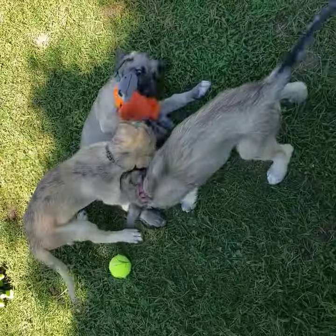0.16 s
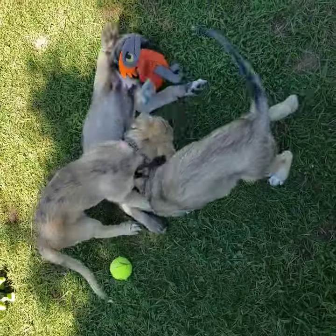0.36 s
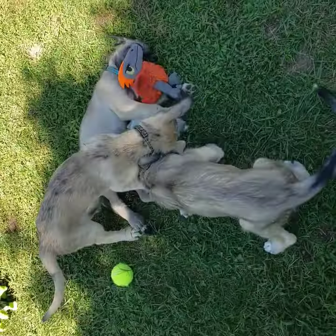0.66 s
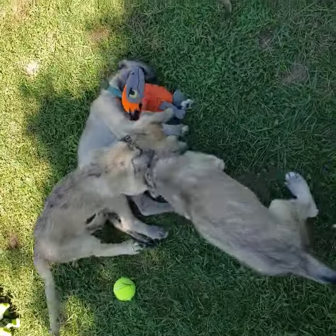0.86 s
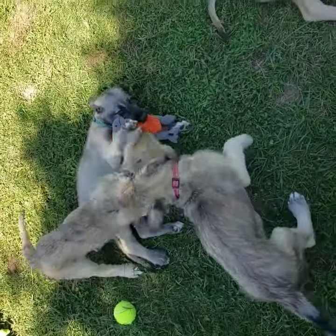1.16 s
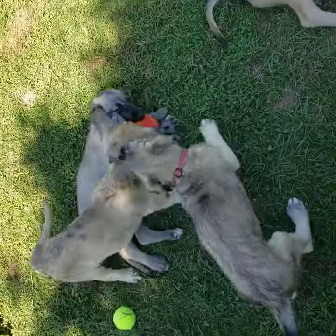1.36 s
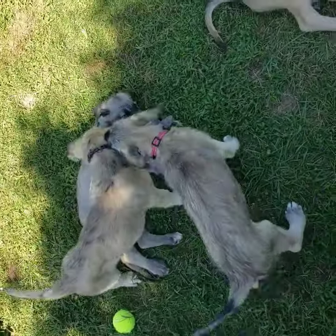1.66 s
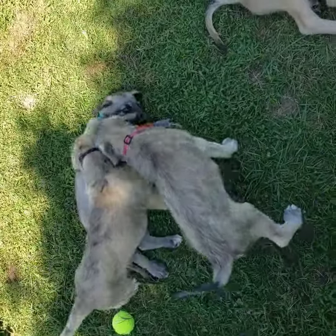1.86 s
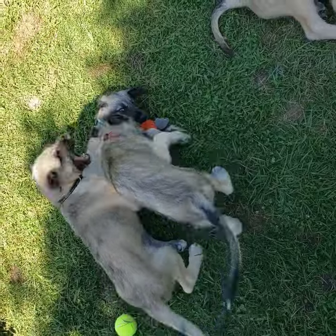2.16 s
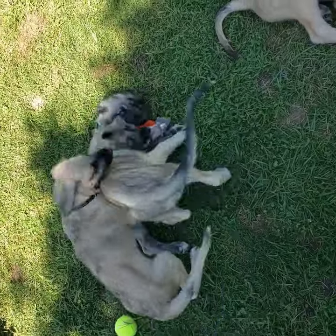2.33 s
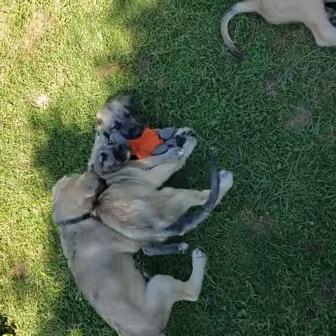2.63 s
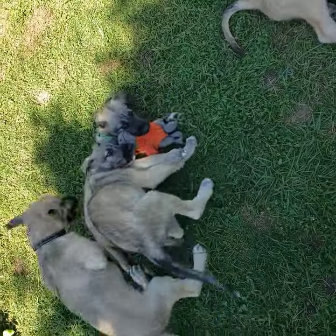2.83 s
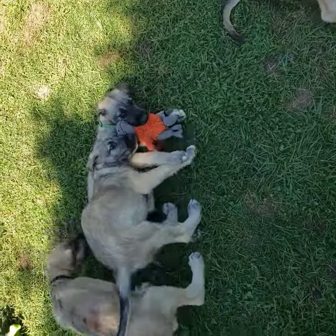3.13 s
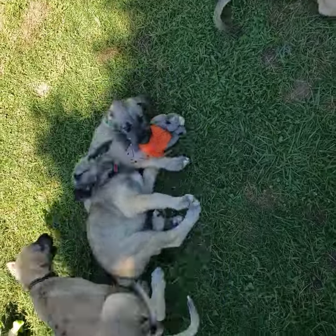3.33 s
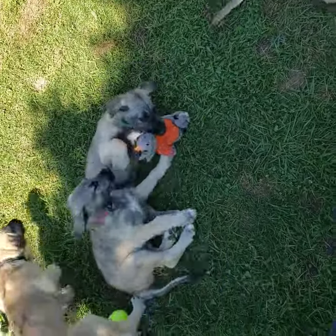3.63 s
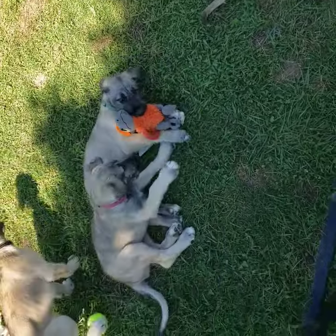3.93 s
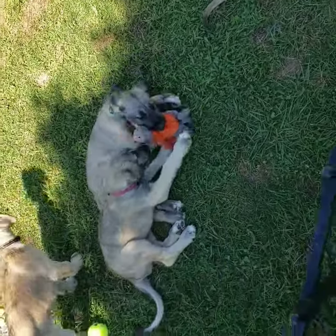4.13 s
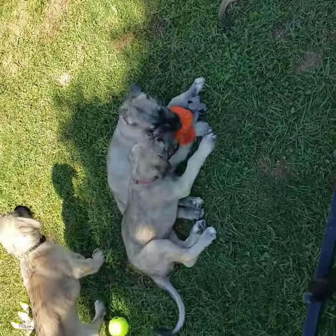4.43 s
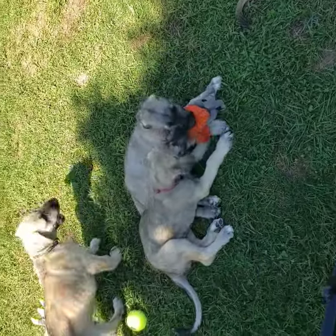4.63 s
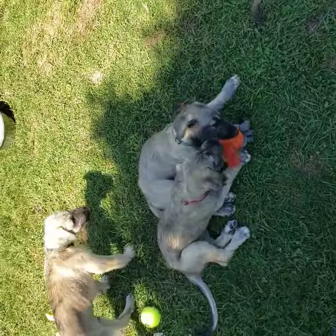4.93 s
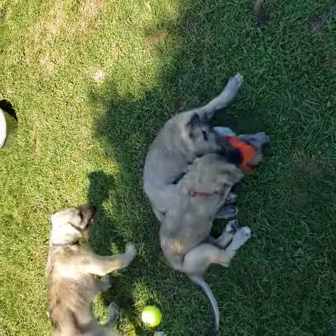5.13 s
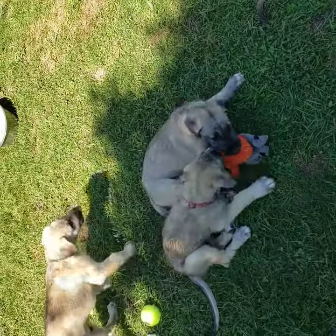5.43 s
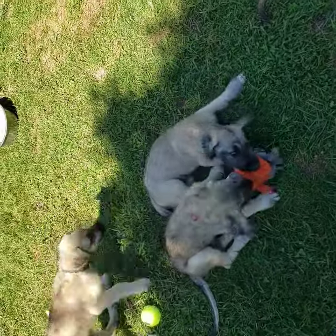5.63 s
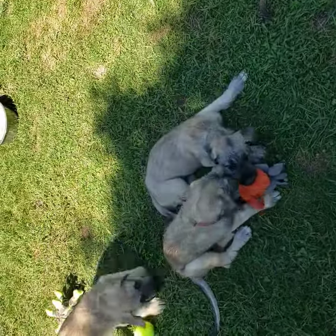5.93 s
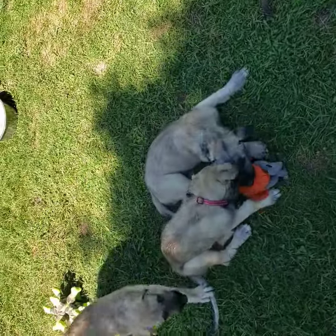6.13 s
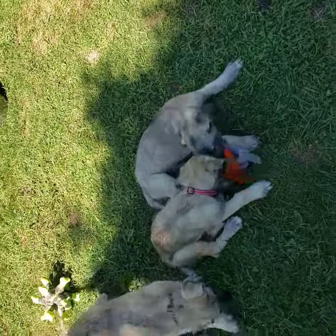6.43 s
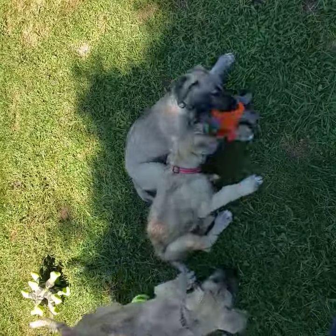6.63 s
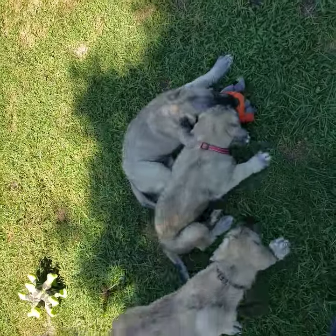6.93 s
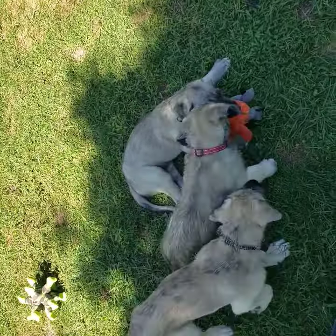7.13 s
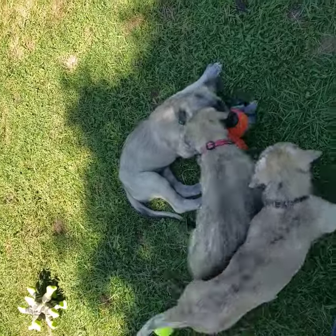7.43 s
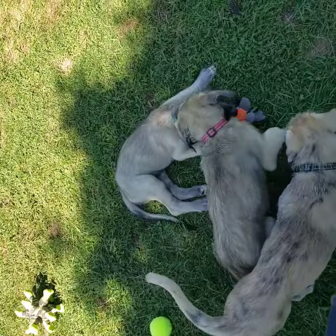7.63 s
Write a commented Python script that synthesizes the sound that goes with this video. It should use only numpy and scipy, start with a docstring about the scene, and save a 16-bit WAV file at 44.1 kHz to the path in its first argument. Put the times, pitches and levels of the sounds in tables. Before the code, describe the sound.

Close outdoor puppy play, with short throaty growls giving way to nasal, reedy toy squeaks and screechy breaks over quiet air and rustling grass.

```python
"""Puppies wrestling over a squeaky toy

Puppies wrestle on a lawn, heard from just above on a stereo pair of microphone ports. One growls in rough,
low bouts: uneven vocal-fold pulses ring the chest and mouth. Another chews a plush toy: its reed, a stack of
partials, squeaks when bitten, cries again as the bladder refills, and overblows when the bladder buckles.
Grass rustles in shaped noise over a quiet outdoor hiss, mouths rasp, and puffs of air bump the microphone."""
import sys
import numpy as np
from scipy import signal
from scipy.fft import rfft, irfft, next_fast_len
from scipy.io import wavfile
from scipy.ndimage import uniform_filter1d

SR = 44100
rng = np.random.default_rng(int(sys.argv[2]) if len(sys.argv) > 2 else 0)


def store_wav(level_fs):
    """Save 16-bit WAV to argv[1]."""
    pcm = np.round(np.clip(np.atleast_2d(level_fs), -1, 1) * 32767)
    wavfile.write(sys.argv[1], SR, pcm.T.astype(np.int16))


N = 343539
TIME = np.arange(N) / SR
CUTOFF_HZ = 15700

# Still air of the garden: hz, level_db (relative)
AIR_COLOUR = [(41, -26.5), (70, 0.5), (100, -3.5), (161, -8), (337, -10.5), (774, -25), (2380, -31),
              (3730, -35.5), (4770, -28.5), (6830, -52), (8370, -26.5), (12000, -61.5), (15000, -29)]
AIR_DB = -65
# Likeness of noise at the two ports: hz, correlation (1 = identical)
PORT_LIKENESS = [(30, 1), (70, 0.25), (140, 0.7), (350, 0.84), (1000, 0), (3000, 0.11), (15000, 0)]

# Low buffeting of air and movement: time_s, level_db (before RUMBLE_TRIM_DB)
RUMBLE_LEVEL = [(0, -59), (0.9, -54), (3.0, -56), (3.9, -63.5), (5.2, -59), (6.8, -66), (7.5, -48.5)]
# Its spectrum: hz, level_db (relative)
RUMBLE_SPECTRUM = [(15, -44.5), (30, -11.5), (52, -2), (75, -2), (100, -1), (160, -25.5), (400, -91)]
RUMBLE_TRIM_DB = -1.0

# Brushing through the grass: time_s, level_db
BRUSHING = [(0, -65.5), (.6, -61), (.85, -64.5), (1.25, -65.5), (1.45, -67), (2.65, -65.5), (2.9, -66.5),
            (3.25, -61), (3.6, -61), (4.05, -71.5), (5.08, -71.5), (5.15, -62), (5.4, -73), (6.1, -63),
            (6.65, -72), (7.79, -70.5)]
# Airy swish of the blades: hz, level_db (relative)
SWISH_COLOUR = [(3000, -26.5), (7500, -17.5), (9000, -12.5), (10500, -7.5), (12200, 1), (13500, -4),
                (15500, -12)]
# Crackle of the blades: hz, level_db (relative)
CRACKLE_COLOUR = [(600, 12.5), (2400, 8.5), (3300, 5), (4800, -4), (7000, -6), (10000, -1), (15000, -48)]
CRACKLE_DB = -12.5  # relative to the brushing
# Paws and bodies crush the grass: start_s, swell_s, fade_s, crest_level_db
TRAMPLES = [(.58, 0.087, 0.5, -53.5), (1.25, 0.19, 0.3, -58), (1.9, .3, 0.88, -60), (5.1, 0.027, 0.16, -79)]
SLACK_TRAMPLE_DB = 22  # how much quieter a tumble begins and ends
# Snapping stalks and clicking teeth: start_s, level_db (before the trim in snaps)
SNAPS = [(0.644, -41.5), (0.659, -35), (0.755, -38), (1.0506, -35.5), (2.188, -47), (3.941, -46.5),
         (4.547, -49), (5.1116, -45.5), (6.188, -53), (6.747, -50), (7.2324, -48), (7.2678, -54)]
# Their spectrum: hz, level_db (relative)
SNAP_SPECTRUM = [(1000, -16), (2400, 2.5), (3500, -6), (5500, 0), (9000, -0.5), (13000, 5), (16000, -3)]

# Growls: start_s, swell_s, fade_s, top_pitch_hz, roughness (0-1),
# chest_db, open_mouth_db, snarl_db (at the crest, before the trims in growl)
GROWLS = [ (0.085, 0.028, .28, 107.9, 0.83, -48.5, -66, -67.5),
          (0.53, 0.21, 0.23, 122.3, 0.53, -41.5, -62, -58.5),
          (0.79, 0.032, .26, 104.2, .5, -46.5, -60.5, -56.5),
          (1.301, 0.27, 0.26, 142.6, 0.46, -48.5, -59, -53), (1.73, .32, .12, 123.7, 0.43, -42.5, -56, -58),
          (2.03, .08, 0.2, 115.5, .75, -46, -57, -50.5), (2.42, .07, .33, 124.5, .6, -49, -64.5, -76),
          (2.74, .24, 0.17, 134.2, 0.49, -47.5, -67.5, -86),
          (7.12, 0.076, .14, 125.3, .35, -55.5, -81, -77), (7.31, 0.059, .13, 156.4, .2, -45, -66, -64),
          (7.512, 0.061, 0.089, 145.1, .32, -47.5, -64, -64.5),
          (7.721, .06, .10, 110.6, 0.58, -63, -72, -60.5)]
# Resonances of throat and mouth, each table: centre_hz, width_hz (before tract narrows it), level_db (relative)
CHEST_MODES = [(143.4, 95, 9), (279, 183, -3.5), (397, 93, -1.5), (530, 370, -21)]
MOUTH_MODES = [(720, 243, 0.17), (961, 210, 0.67)]
SNARL_MODES = [(1246, 990, 2.5), (1690, 85, -1), (2207, 390, 6.5), (3260, 180, -2), (4800, 900, -79.5)]
# How far the voice drops at least effort; the mouth closes faster than the chest quietens
SLACK_CHEST_DB, SLACK_MOUTH_DB, SLACK_SNARL_DB, SLACK_PITCH_SHARE = 11, 20, 19, .24
PUSH_EDGE_S = .035  # soft opening and shutting of each growl and tumble

# Squeaks of the toy's reed: start_s, length_s, release_s, start_hz, end_hz, start_db, end_db,
# fundamental_db, upper_partials_db (both relative to the reed colour), flow (0 air out, 1 air in)
SQUEAKS = [ (0.992, 0.052, 0.032, 1140, 1184, -43.5, -41, -3.5, -4.5, 0),
           (1.099, .088, .050, 1196, 1176, -46, -48, 2, 0.5, 1),
           (2.261, 0.063, 0.0274, 1201, 1128, -51.5, -53.5, 6, 2, 0),
           (3.002, 0.062, 0.043, 1194, 1200, -53.5, -46, 10.5, 4, 0),
           (3.518, 0.19, 0.015, 1138, 1099, -41, -43.5, -12, -5, 0),
           (3.734, 0.18, 0.029, 1211, 1160, -41.5, -46, 3.5, 3.5, 1),
           (4.271, 0.17, 0.017, 1164, 1145, -43.5, -38.5, 0, 4.5, 0),
           (4.462, 0.25, 0.049, 1224, 1150, -44, -51.5, 10, 5.5, 1),
           (5.353, 0.037, 0.029, 1122, 1136, -54.5, -61, 18, 0.5, 0),
           (5.804, 0.084, .026, 1120, 1152, -43.5, -38, 4, 2.5, 0),
           (5.948, 0.14, 0.041, 1164, 1186, -44.5, -49, 12, 7.5, 1),
           (6.225, 0.21, 0.04, 1150, 1195, -41, -40.5, -15.5, -1, 0),
           (6.529, 0.081, 0.023, 1178, 1154, -58, -53, 7, 7, 1),
           (6.837, 0.3, 0.039, 1165, 1202, -53.5, -44.5, 7, 4.5, 1)]
# Reed colour through the plush: hz, squeezed_db, refilling_db (relative)
REED_COLOUR = [(1050, -1.5, 0), (1836, -9, -2), (2587, 6, 10), (2850, -5, 12), (3000, -17, -14),
               (4220, -2.5, -9), (5000, -3.5, -7), (6030, -11, -30.5), (7380, -12, -12.5),
               (7710, -11.5, -18), (9020, -3, 1.5), (10540, -24, -17.5), (13500, -19.5, -20),
               (15400, -46, -26)]
# The toy at the two ports: hz, left_over_right_db, left_lead_rad
TOY_PLACE = [(1150, 4, 1.38), (2240, -9.5, 1.05), (3630, 7.5, 1.51), (5000, -7.5, 2.57), (7010, 14, 6.7),
             (8800, 6.5, 8.6), (9800, 7, 6.7), (12800, -1.5, 8.2)]
# The bladder gives way and drives a surge of air; pressure builds ahead of the jump:
# jump_s, build_up_s, pitch_gain_before_hz, pitch_gain_after_hz, surge_length_s, level_gain_db
SURGES = [ (4.394, .024, 270, 647, .029, -1.5), (4.533, 0.03, 66.3, 66, 0.037, 3),
          (5.829, 0.0064, 59, 278, 0.025, 3), (6.045, 0.056, 66.4, 62.3, 0.015, 3),
          (6.256, 0.013, 106, 102, 0.073, 0.5), (6.355, .034, 545, 1126, .037, 8),
          (6.949, 0.016, 47.5, 46.3, 0.03, 1), (7.095, 0.016, 77.94, 72.26, 0.014, 5)]
# Air hissing past the reed: hz, level_db (relative)
TOY_AIR_COLOUR = [(500, -15.5), (1150, 7), (1700, -10.5), (2400, 4), (3300, -42), (4600, 5), (6500, -8),
                  (9000, -1), (15000, -26)]
TOY_AIR_DB = -24  # relative to the tone
# The reed starts flat and faint until the pressure is up, and sinks again as it runs out
ATTACK_S, SCOOP_SHARE, ATTACK_DB = 0.014, 0.031, 11.5
SAG_SHARE, RELEASE_DB = 0.11, 3.5
SOFT_REED_DB = 9  # upper partials lost at low pressure

# Soft thuds of air on the microphone: start_s, swell_peak_db, pitch_hz, port (0 left, 1 right)
THUDS = [(1.116, -32, 64, 0), (1.149, -35, 50.4, 0), (2.451, -43, 71, 0), (4.134, -36.5, 79, 0),
         (5.023, -41.5, 60.5, 0), (5.073, -41, 74, 0), (5.276, -29, 80, 1), (5.486, -34.5, 86.5, 1),
         (5.634, -39.5, 61, 1), (5.74, -41, 69, 1), (7.504, -31, 61.45, 1), (7.615, -38, 60.2, 0)]
# Short rasps and buzzes of mouths, fur and plush: start_s, length_s, start_hz, end_hz, width_hz, level_db
RASPS = [(1.379, 0.35, 468.7, 481, 130.1, -58), (2.153, 0.025, 1417, 1478, 350.4, -50.5),
         (2.26, 0.059, 619.5, 649, 720, -54), (2.341, .105, 1509, 2418, 670, -57),
         (2.4, 0.098, 3467, 4386, 1807, -61.5), (3.702, 0.12, 3440, 2850, 400, -64),
         (5.1, 0.11, 4610, 4530, 1610, -65.5), (5.197, 0.12, 4410, 4560, 1800, -73)]
# The bladder buckles with a knock: start_s, peak_db
POPS = [(4.393, -46), (4.54, -48), (5.828, -33.5), (6.355, -33.5)]
# Ringing of the bladder: pitch_hz, t60_s, level_db (relative)
BLADDER_MODES = [(190, 0.0067, -29), (353, 0.021, 16.5), (518.9, 0.0049, -42.5)]


def from_db(db):
    """Decibels to gain."""
    return 10 ** (np.asarray(db) / 20)


def rms_one(x):
    """Scale to unit power."""
    return x / np.sqrt(np.mean(x ** 2) + 1e-20)


def in_time(rows):
    """Columns of a curve, joined by straight lines."""
    s, *columns = np.transpose(rows)
    return [np.interp(TIME, s, column) for column in columns]


def at_hz(points, hz):
    """Columns of a spectrum, read on a log-frequency axis."""
    f, *columns = np.transpose(points)
    return [np.interp(np.log(hz + 1e-9), np.log(f), column) for column in columns]


def drift(rate_hz, size=N):
    """Random wander of spread 1: straight lines between random knots, rate_hz knots a second."""
    knots = rng.standard_normal(int(size / SR * rate_hz) + 4)
    return rms_one(np.interp(np.arange(size) / SR * rate_hz, np.arange(len(knots)), knots))


def resonate(x, hz, width_hz):
    """A two-pole resonance with gain of about 1 at its top."""
    r = np.exp(-np.pi * width_hz / SR)
    feed = np.array([1, 0, -1]) * (1 - r * r) / 2
    feedback = [1, -2 * r * np.cos(2 * np.pi * hz / SR), r * r]
    return signal.lfilter(feed, feedback, x + 1e-18)


def cut(x, hz, kind, order=2):
    """Butterworth low- or high-pass."""
    return signal.sosfilt(signal.butter(order, hz, kind, fs=SR, output="sos"), x + 1e-18)


def noise(colour):
    """Stereo noise of a given colour, its ports as alike at each frequency as PORT_LIKENESS says."""
    size = next_fast_len(N)
    hz = np.arange(size // 2 + 1) * SR / size
    alike = np.clip(at_hz(PORT_LIKENESS, hz)[0], -1, 1)
    mid, side = rfft(rng.standard_normal((2, size)))
    both = np.sqrt(1 + alike) * mid + np.sqrt(1 - alike) * side * [[1], [-1]]
    coloured = irfft(both * from_db(at_hz(colour, hz)[0]), size)
    return rms_one(coloured[:, :N])


def place(x, pan_db, lead_ms):
    """A source reaches the left port earlier than the right, and louder there if pan_db is positive."""
    left = x * from_db(pan_db / 2)
    right = np.interp(TIME - lead_ms / 1000, TIME, x) * from_db(-pan_db / 2)
    return np.array([left, right])


def arch(s, swell_s, fade_s):
    """One push: its slackness (1 at the ends, 0 at the crest) and a gate that opens and shuts softly."""
    end = s + swell_s + fade_s
    effort = np.interp(TIME, [s, s + swell_s, end], [0, 1, 0])
    gate = np.clip(np.minimum(TIME - s, end - TIME) / PUSH_EDGE_S + .5, 0, 1)
    return 1 - effort, gate


def still_air():
    """The steady outdoor hiss: noise with a strong low end."""
    return from_db(AIR_DB) * noise(AIR_COLOUR)


def rumble():
    """Low buffeting of air and movement: deep noise that swells and ebbs."""
    level_db, = in_time(RUMBLE_LEVEL)
    return from_db(level_db + RUMBLE_TRIM_DB) * noise(RUMBLE_SPECTRUM)


def trampling():
    """Gain added to the crackle: each tumble leans into the grass and lifts off again."""
    out = 0
    for s, swell_s, fade_s, db in TRAMPLES:
        slack, gate = arch(s, swell_s, fade_s)
        out = out + gate * from_db(db - SLACK_TRAMPLE_DB * slack)
    return out


def snaps(decay_s=0.0067, trim_db=-8):
    """Stalks snap and teeth click: bursts of coloured noise that die exponentially."""
    hits = np.zeros(N)
    for s, db in SNAPS:
        hits[int(s * SR)] += from_db(db + trim_db)
    bursts = signal.lfilter([1], [1, -np.exp(-1 / (decay_s * SR))], hits + 1e-18)
    return bursts * noise(SNAP_SPECTRUM)


def grass(swish_grain_db=1.5, crackle_grain_db=0.0):
    """Blades brush and crackle under the puppies as noise of wandering level, with snaps on top."""
    brush_db, = in_time(BRUSHING)
    swish_wander_db = swish_grain_db * drift(300) + drift(31)
    swish = from_db(brush_db) * rms_one(noise(SWISH_COLOUR) * from_db(swish_wander_db))
    crackle_wander_db = crackle_grain_db * drift(500) + 3.3 * drift(40)
    crackle_gain = from_db(brush_db + CRACKLE_DB) + trampling()
    crackle = crackle_gain * rms_one(noise(CRACKLE_COLOUR) * from_db(crackle_wander_db))
    return swish + crackle + snaps()


def voice(chest_curve=1.6, mouth_curve=0.62):
    """Effort swells and fades in each growl, raising the pitch and opening the mouth: pitch, roughness, 3 gains."""
    pitch, rough, gains = np.full(N, 100.), np.zeros(N), np.zeros((3, N))
    for s, swell_s, fade_s, top_hz, roughness, chest_db, mouth_db, snarl_db in GROWLS:
        slack, gate = arch(s, swell_s, fade_s)
        sunk, shut = slack ** chest_curve, slack ** mouth_curve
        own = gate * from_db([chest_db - SLACK_CHEST_DB * sunk,
                              mouth_db - SLACK_MOUTH_DB * shut,
                              snarl_db - SLACK_SNARL_DB * shut])
        # where growls overlap, the one with the stronger chest sets pitch and roughness
        leads = own[0] > gains[0]
        pitch = np.where(leads, top_hz * (1 - SLACK_PITCH_SHARE * slack), pitch)
        rough = np.where(leads, roughness, rough)
        gains = np.maximum(gains, own)
    return pitch, rough, *gains


def tract(source, modes, narrowing=0.88):
    """Parallel resonances, each applied twice for dark valleys; the slow level is evened out."""
    voiced = 0
    for k, (hz, width_hz, db) in enumerate(modes):
        once = resonate(source, hz, narrowing * width_hz)
        twice = resonate(once, hz, narrowing * width_hz)
        voiced = voiced + (-1) ** (k + 1) * from_db(db) * twice
    power = uniform_filter1d(voiced ** 2, size=1700)
    return voiced / np.sqrt(np.abs(power) + 1e-3 * power.mean())


def growl(jitter=.27, shimmer_db=5, doubling_db=5, chest_db=-0.5, mouth_db=7.0, snarl_db=2):
    """Slack vocal folds slap shut unevenly, strong and weak in turn; each slap lets out a puff of turbulence."""
    pitch, rough, chest, mouth, snarl = voice()
    cycles = np.cumsum(pitch * np.exp(jitter * rough * drift(170))) / SR
    count = cycles.astype(int)
    uneven_db = shimmer_db * np.clip(rng.standard_normal(N), -2, 2) - doubling_db * (count % 2)
    slaps = np.diff(count, prepend=0) * from_db(rough * uneven_db)
    # squaring favours the hardest slaps, the ones sharp enough to ring the mouth
    cracks = slaps ** 2
    puff_level = signal.lfilter([1], [1, -np.exp(-1 / (.004 * SR))], cracks + 1e-18)  # 4 ms decay
    puffs = .12 * puff_level * rng.standard_normal(N)
    low = chest * from_db(chest_db) * cut(tract(slaps + 0.45 * puffs, CHEST_MODES), 770, "low", order=6)
    middle = mouth * from_db(mouth_db) * tract(cracks + puffs, MOUTH_MODES)
    high = snarl * from_db(snarl_db) * tract(cracks + 2 * puffs, SNARL_MODES)
    # the left port hears more of the deepest part
    bass = cut(low, 260, "low", order=1)
    deep = place(bass, pan_db=7.5, lead_ms=0.074)
    body = place(low - bass, pan_db=-5.5, lead_ms=0.28)
    return deep + body + place(middle + high, pan_db=-4.0, lead_ms=0.13)


def surges(t):
    """Pitch (Hz) and level (dB) gained: pressure builds, jumps as the wall gives, holds and is spent."""
    gained_hz, gained_db = 0, 0
    for jump_s, build_s, before_hz, after_hz, length_s, surge_db in SURGES:
        away = np.abs(t - jump_s)
        building = before_hz / after_hz * np.exp(-away / build_s)
        spending = np.exp(-(away / length_s) ** 3)
        surge = np.where(t < jump_s, building, spending)
        gained_hz = gained_hz + after_hz * surge
        gained_db = gained_db + surge_db * surge ** 2
    return gained_hz, gained_db


def squeeze(t, release_s, start_hz, end_hz, start_db, end_db):
    """Air pressure sets pitch, level and dulling: a quick attack, a sloping hold with surges, a sagging release."""
    starting = np.clip(1 - (t - t[0]) / ATTACK_S, 0, 1) ** 2
    ending = np.clip(1 - (t[-1] - t) / release_s, 0, 1) ** 2
    surge_hz, surge_db = surges(t)
    held_hz = np.linspace(start_hz, end_hz, len(t)) + surge_hz
    pitch = held_hz * (1 - SCOOP_SHARE * starting - SAG_SHARE * ending)
    held_db = np.linspace(start_db, end_db, len(t)) + surge_db
    level_db = held_db - ATTACK_DB * starting - RELEASE_DB * ending ** 2
    return pitch, level_db, SOFT_REED_DB * (starting + ending)


def reed(t, pitch, level_db, body_db, edge_db, refill, shading_db=4.0, dull_db=8, lift_db=4, screech=0.66):
    """The beating reed gives a harmonic stack; the moving jaws and plush shade each partial from the third up."""
    # forced far above its own pitch, the reed beats strong and weak in turn: side tones between the partials
    strain = np.clip((pitch - 1300) / 500, 0, 1)
    pitch = pitch * (1 + (.003 + .012 * strain) * drift(300, size=len(t)))
    phase = 2 * np.pi * np.cumsum(pitch) / SR
    flutter = screech * strain ** 2 * np.sin(phase / 2 + .5 * drift(299, size=len(t)))
    sides = np.array([[.5], [-.5]])  # left, right
    out, power = 0, 0
    for k in range(1, 14):
        hz = k * pitch
        if k == 1:
            offset_db = body_db + strain * (lift_db + np.maximum(-body_db, 0))
        elif k == 2:
            offset_db = 0
        else:
            offset_db = edge_db + shading_db * drift(23.66, size=len(t))
        db = at_hz(REED_COLOUR, hz)[int(refill)] + offset_db
        strain_loss_db = dull_db * strain * (2 * hz / CUTOFF_HZ) ** 2
        gain = from_db(db - strain_loss_db) * (hz < CUTOFF_HZ)
        pan_db, lead_rad = at_hz(TOY_PLACE, hz)
        ports = gain * from_db(sides * pan_db)
        start_rad = rng.uniform(0, 2 * np.pi)
        out = out + ports * np.sin(k * phase + np.sqrt(k - 1) * flutter + sides * lead_rad + start_rad)
        power = power + np.mean(ports ** 2, axis=0) / 2
    dying = np.clip((t[-1] - t) / .012, 0, 1)  # the last 12 ms
    return out / np.sqrt(power) * from_db(level_db) * dying


def toy():
    """All the squeaks in turn, each with a faint hiss of air past the reed."""
    out, air = np.zeros((2, N)), noise(TOY_AIR_COLOUR)
    for s, length_s, *pressure, body_db, edge_db, flow in SQUEAKS:
        span = slice(int(s * SR), int((s + length_s) * SR))
        pitch, level_db, dimmed_db = squeeze(TIME[span], *pressure)
        tone = reed(TIME[span], pitch, level_db, body_db, edge_db - dimmed_db, flow > .5)
        out[:, span] += tone + from_db(level_db + TOY_AIR_DB) * air[:, span]
    return out


def thuds(rise_s=0.01):
    """A puff of air catches one microphone port: a push of a few slow cycles."""
    out, t = np.zeros((2, N)), TIME[:SR // 8]
    swell = (t / rise_s * np.exp(1 - t / rise_s)) ** 2
    for s, db, hz, port in THUDS:
        out[int(port > .5), int(s * SR):][:len(t)] -= from_db(db) * swell * np.sin(2 * np.pi * hz * t)
    return out


def rasps(grain_db=4):
    """Grainy hisses, band-limited noise whose resonance glides as the mouth changes shape."""
    out = np.zeros(N)
    for s, length_s, start_hz, end_hz, width_hz, db in RASPS:
        size = int(length_s * SR)
        glide_hz = np.linspace(start_hz, end_hz, size)
        carrier = np.exp(2j * np.pi * np.cumsum(glide_hz) / SR)
        raw = rng.standard_normal(size) + 1j * rng.standard_normal(size)
        hiss = (cut(raw, width_hz / 2, "low") * carrier).real
        grainy = rms_one(hiss * from_db(grain_db * drift(233, size=size)))
        out[int(s * SR):][:size] += from_db(db) * grainy * signal.windows.tukey(size, .5)
    return place(out, pan_db=-1.5, lead_ms=0.062)


def pops():
    """The bladder snaps inward with a short hollow knock of three decaying modes."""
    out, t = np.zeros(N), TIME[:SR // 10]
    knock = 0
    for hz, t60, mode_db in BLADDER_MODES:
        knock = knock + from_db(mode_db - 60 * t / t60) * np.sin(2 * np.pi * hz * t)
    for s, db in POPS:
        out[int(s * SR):][:len(t)] += from_db(db) * knock / np.abs(knock).max()
    return place(out, pan_db=-1.0, lead_ms=0.27)


def garden(x, scatter_db=-17.0, t60=0.2, echo_db=-18, echo_s=0.014):
    """One short echo and a weak, quickly dying scatter from things nearby."""
    t = TIME[:SR // 3]
    scatter = cut(rng.standard_normal((2, len(t))), 9800, "low") * from_db(-60 * t / t60) * (t > echo_s / 2)
    scatter /= np.sqrt(np.sum(scatter ** 2, axis=1, keepdims=True))
    echo = np.array([np.interp(TIME - echo_s, TIME, port) for port in x])
    scattered = signal.fftconvolve(x, scatter, axes=1)[:, :N]
    return x + from_db(echo_db) * echo + from_db(scatter_db) * scattered


def scene():
    """Puppies and toy on the lawn, over rumble and still air."""
    play = garden(growl() + toy() + rasps() + pops())
    return still_air() + rumble() + grass() + play + thuds()


def record(dry):
    """The microphone's top is cut steeply by a zero-phase low-pass."""
    steep = signal.ellip(10, .1, 70, CUTOFF_HZ, fs=SR, output="sos")
    return signal.sosfiltfilt(steep, dry)


dry = scene()
out = record(dry)
store_wav(out)
```